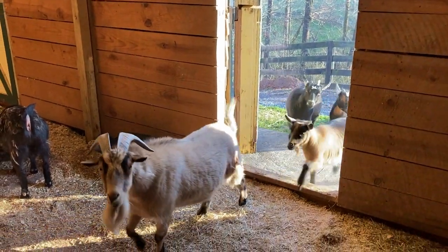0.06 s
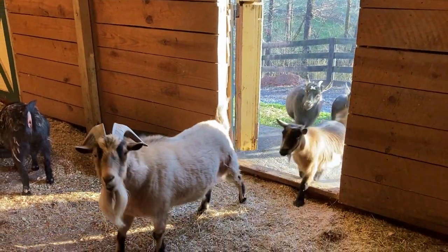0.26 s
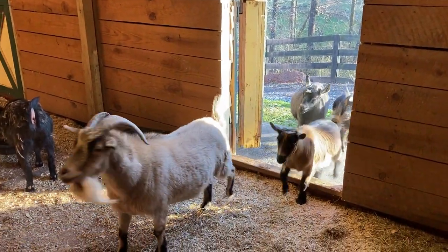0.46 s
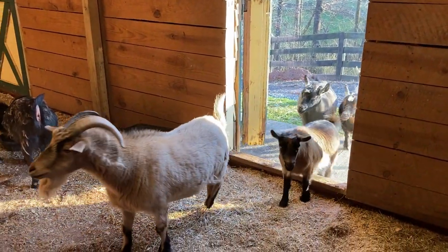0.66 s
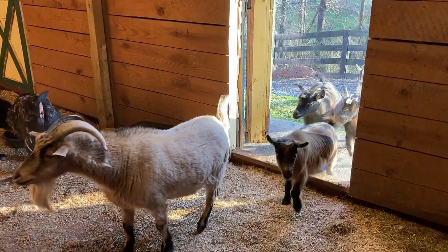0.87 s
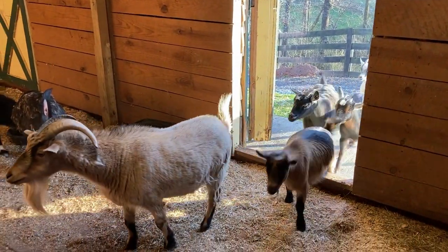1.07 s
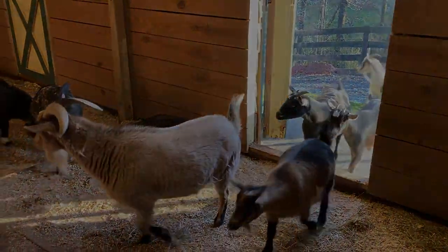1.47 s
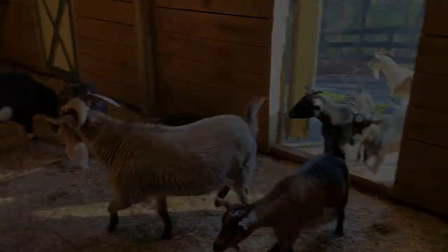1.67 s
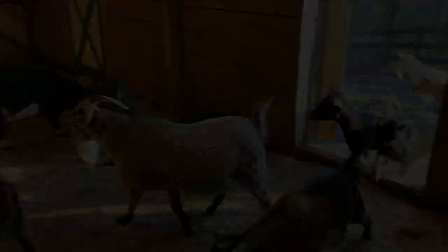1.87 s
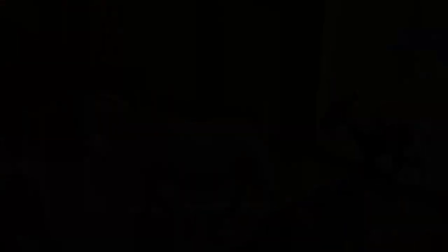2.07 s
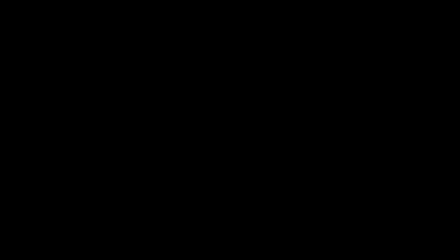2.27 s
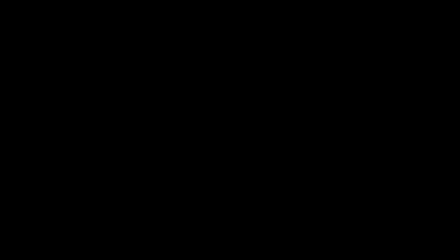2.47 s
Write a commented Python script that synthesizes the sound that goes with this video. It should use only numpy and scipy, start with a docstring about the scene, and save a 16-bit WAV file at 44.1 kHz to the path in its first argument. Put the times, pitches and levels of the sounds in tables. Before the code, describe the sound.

Goat hooves thud softly on a wooden barn floor, strongest around 0.2 and 0.3 seconds, leaving the boards booming briefly. A hoof knocks sharply at about 1.1 seconds. Bedding rustles, scuffs and ticks close by throughout, with a crisp snap at 1.5 seconds. Faint rising whistles, probably a bird outside, come near 1 and 1.3 seconds. Lighter steps follow around 1.7 and 2.1 seconds as the quiet background hiss fades.

```python
"""Inside a barn, on a wooden floor strewn with shavings, goats are walking about. Their soft thuds run
through the boards as bending waves, treble first and bass last, and leave the floor booming; a hoof
knocks sharply on wood. Bedding rustles, scuffs and snaps, and single straws tick close to the microphone.
A thin rising whistle, probably a bird outside, sounds over a quiet hiss."""
import sys
import numpy as np
from scipy import signal
from scipy.fft import rfft, irfft
from scipy.io import wavfile

SR = 44100
rng = np.random.default_rng(int(sys.argv[2]) if len(sys.argv) > 2 else 0)


def transcribe(signal):
    """Save signal, clipped to [-1, 1], as a 16-bit WAV file at the path in sys.argv[1]."""
    frames = np.atleast_2d(signal).T
    limited = np.clip(frames, -1, 1)
    pcm = np.round(limited * 32767).astype(np.int16)
    wavfile.write(sys.argv[1], SR, pcm)


N = 110250
T = np.arange(N) / SR
HZ = np.maximum(np.arange(N + 1) * SR / (2 * N), 1)  # bins of an FFT padded to 2 N


def undb(db):
    """Decibels to gain."""
    return 10 ** (np.asarray(db) / 20)


def filt(x, gain):
    """Apply a frequency response given on HZ."""
    return irfft(rfft(x, 2 * N) * gain)[..., :N]


def lowpass(hz, order=3):
    """Response of a causal low-pass."""
    return signal.freqs(*signal.butter(order, 1, analog=True), HZ / hz)[1]


def highpass(hz):
    """Gain of a gentle high-pass, one half at hz."""
    return HZ ** 2 / (HZ ** 2 + hz ** 2)


def delay(s):
    """Response of a delay."""
    return np.exp(-2j * np.pi * HZ * s)


def colour(x, spectrum):
    """Give white noise a spectrum and keep its power."""
    hz, db = np.array(spectrum).T
    gain = undb(np.interp(np.log(HZ), np.log(hz), db))
    return filt(x, gain / np.sqrt(np.mean(gain ** 2)))


def noise(wide_hz=556):
    """Diffuse stereo noise, alike on both sides in the bass."""
    mid, side = rng.standard_normal((2, N))
    apart = highpass(wide_hz) / 2
    return filt(mid, np.sqrt(1 - apart)) + np.array([[1], [-1]]) * filt(side, np.sqrt(apart))


def fade(t60, start=0):
    """Exponential decay that falls 60 dB in t60 seconds from its start."""
    return np.exp(-np.log(1000) * np.maximum(T - start, 0) / t60) * (T >= start)


def bursts(events, t60):
    """Noise that jumps up at each event and dies away."""
    return noise() * sum(undb(db) * fade(t60, s) for s, db in events)


def ring(modes):
    """Impulse response of a table of modes."""
    return sum(undb(db) * fade(t60) * np.sin(2 * np.pi * hz * T) for hz, db, t60 in modes)


def tail(bands):
    """Frequency response of dense ringing: noise that dies away band by band."""
    wash, centres = noise(), np.log([row[0] for row in bands])
    shares = [np.interp(np.log(HZ), centres, row) for row in np.eye(len(bands))]
    ringing = sum(undb(db) * filt(wash, share) * fade(t60) for share, (_, db, t60) in zip(shares, bands))
    return rfft(ringing, 2 * N)


def barn(x, wet_db):
    """The direct sound reaches the microphone, then the barn's short reverberation."""
    # reverberation bands (frequency [Hz], relative level [dB], t60 [s])
    bands = [(297, 7, 0.24), (960, 7, 0.21), (3240, 0.5, 0.17), (8000, 2, 0.1), (16700, -4, .12)]
    return filt(x, 1 + undb(wet_db) * tail(bands) * delay(.004))


def air():
    """Low, dull room tone of the open barn."""
    # room tone spectrum (frequency [Hz], relative level [dB])
    spectrum = [(20, -32), (40, -3), (65, 5), (100, 2), (200, -12.5), (420, -7.5), (600, -13.5),
                (1000, -18.5), (1600, -25), (4000, -25.5), (16000, -83)]
    # drift of the room tone (time [s], level [dB])
    levels = [(0, -53.5), (.7, -51.5), (1.35, -53.5), (1.68, -59.5), (2.05, -64.5), (2.33, -60), (2.5, -72)]
    return colour(noise(), spectrum) * undb(np.interp(T, *np.array(levels).T))


def whistles():
    """Probably a bird outside: near-pure notes that swell as they rise and level off."""
    # notes (start [s], length [s], start pitch [Hz], end pitch [Hz], level [dB])
    notes = [(.76, .12, 2500, 2580, -67), (.98, .165, 2300, 2720, -55), (1.285, .19, 2150, 2770, -56)]
    out = 0
    for s, length, from_hz, to_hz, db in notes:
        progress = np.clip((T - s) / length, 0, 1)
        hz = to_hz + (from_hz - to_hz) * (1 - progress) ** 2.4
        swell = np.interp(progress, [0, .08, .38, .46, .74, .92, 1], [0, .15, .2, .85, 1, .7, 0])
        out += undb(db) * swell * np.sin(2 * np.pi * np.cumsum(hz) / SR)
    return out


def rustle(grains_per_s=400, grain_db=-5.5):
    """Hiss with the fine grain of trodden shavings."""
    # spectrum of the shavings (frequency [Hz], relative level [dB])
    spectrum = [(800, -16), (2000, 0), (3500, -7), (5300, -5), (7000, -4.5), (9300, -0.5), (12000, -4),
                (15500, -8.5)]
    # rise and fall of the rustle (time [s], relative level [dB])
    levels = [(0, -65.5), (.17, -70), (.22, -61.5), (.29, -67.5), (.34, -64), (.42, -72), (.46, -65.5),
              (.57, -71), (.61, -65.5), (.9, -67.5), (1.0, -68), (1.15, -64.5), (1.4, -69), (1.6, -67.5),
              (1.71, -75.5), (1.82, -73), (1.88, -70), (1.97, -69), (2.13, -76.5), (2.28, -72.5),
              (2.5, -85.5)]
    grains = (rng.random(N) < grains_per_s / SR) * rng.standard_normal((2, N))
    grains *= undb(np.minimum(rng.exponential(size=N), 4))
    texture = noise() + undb(grain_db) * grains / grains.std()
    return colour(texture, spectrum) * undb(4.5 + np.interp(T, *np.array(levels).T))


def ticks():
    """Dry straws close to the microphone give very short, high ticks."""
    # single straws (time [s], relative level [dB])
    straws = [(.848, -31.5), (1.026, -38), (1.893, -40.5), (2.098, -43)]
    return filt(bursts(straws, t60=.0035), highpass(6000))


def scuffs():
    """Dragged hooves make swells of friction noise, dull on bare wood and bright in the shavings."""
    # drags (start [s], length [s], level [dB], centre [Hz], width [Hz])
    drags = [(0.404, 0.11, -60, 1780, 200), (0.618, 0.026, -58, 3400, 2500),
             (0.894, 0.067, -54.5, 880, 900), (.925, 0.031, -56, 2960, 1800),
             (1.594, 0.081, -59, 1430, 1400), (1.644, 0.084, -56, 440, 150),
             (1.849, 0.04, -61.5, 2900, 5000), (1.947, 0.081, -61, 390, 293), (2.29, 0.16, -84, 490, 490)]
    out, friction = 0, noise()
    for s, length, db, hz, width_hz in drags:
        band = 1 / (1 + ((HZ ** 2 - hz ** 2) / (HZ * width_hz)) ** 2)
        swell = np.interp((T - s) / length, [0, .28, 1], [0, 1, 0])
        out += undb(db) * swell * filt(friction, band / np.sqrt(np.mean(band ** 2)))
    return out


def snaps():
    """Single stalks and shavings break under a hoof in short bright bursts."""
    # breaking stalks (time [s], relative level [dB])
    breaks = [(0.239, -29), (0.591, -19), (.623, -26), (0.932, -16.5), (1.057, -5.5), (1.133, -13),
              (1.441, -14.5), (1.4843, -1), (1.486, -10), (1.494, -36), (1.5, -15), (1.565, -37),
              (2.095, -15), (2.188, -22.5), (2.28, -19.5)]
    # spectrum of a snap (frequency [Hz], relative level [dB])
    spectrum = [(500, -10), (1500, -7), (3000, 2), (5000, -1.5), (8000, -3.5), (12000, -2.5), (16000, -3.5)]
    return undb(-34.5) * colour(bursts(breaks, t60=.013), spectrum)


def knocks(plank_db=-45, crack_db=-31, detune=.025):
    """Hoof blows crack and ring a plank, each a little differently; a harder contact is brighter."""
    # hoof on wood (time [s], relative level [dB], contact cut-off [Hz])
    blows = [(1.056, 3.5, 3750), (1.062, 0, 1470), (1.069, 2, 1340), (1.114, -19, 3000),
             (1.615, -22.5, 2640), (1.624, -19.5, 1210)]
    # plank modes (frequency [Hz], relative level [dB], t60 [s])
    plank = [(644, -16, 0.29), (779, -7, 0.29), (775, -34, .14), (840, -7.5, .13), (850, -2.5, 0.079),
             (1031, 4, 0.12), (1582, -12, 0.24), (1815, 1.5, 0.07), (2490, -6, 0.04), (2683, -8, 0.36),
             (3410, -2.5, .05)]
    # bands of the splintery crack (frequency [Hz], relative level [dB], t60 [s])
    crack_bands = [(300, -32, .12), (577, -2, 0.066), (850, 7, 0.11), (1240, -12, 0.36), (1870, -5.5, 0.27),
                   (3280, -5, 0.098), (5800, -31, 0.033), (12000, -8, .02)]
    out = 0
    for s, db, contact_hz in blows:
        modes = [(hz * (1 + detune * rng.uniform(-.83, 1)), level, t60) for hz, level, t60 in plank]
        crack = irfft(tail(crack_bands))[:, :N]
        wood = undb(plank_db) * ring(modes) + undb(crack_db) * crack
        out += filt(wood, undb(db) * delay(s) * lowpass(contact_hz, order=2))
    return out


def thuds(wave_db=15, timber_db=-2, front_hz=450, pan_db=-3.5):
    """Soft steps spread as bending waves, return from the floor's edges and ring its modes and timber."""
    # hoof falls (time [s], relative level [dB], contact cut-off [Hz], floor boom [dB])
    steps = [(.216, 0, 346, -4), (.336, 7.5, 353, 2.5), (0.499, -25.5, 152.5, 24), (.66, -12.5, 129, 4.5),
             (.735, -19, 143, -3), (1.06, -7, 333, 0.5), (1.49, -19, 73, 14), (1.727, -12, 298, -3),
             (2.141, -9.5, 398, 0)]
    # returns from the floor's edges (delay [s], gain [dB], cut-off [Hz])
    returns = [(.033, -6, 220)]
    # floor modes (frequency [Hz], relative level [dB], t60 [s])
    floor_modes = [(77.86, -45.5, 0.9), (135, -35, 0.47), (174, -71, 0.18), (193, -46.5, 0.39),
                   (213.7, -46, 0.21), (254.6, -39, 0.27)]
    # dense ringing of the barn's timber (frequency [Hz], relative level [dB], t60 [s])
    timber_bands = [(40.5, -15, 1), (63.5, -15, 1), (122, -6.5, 0.52), (181, -4.5, 0.41), (324, -5.5, 0.18),
                    (540, -17, 0.24), (930, -12, 0.12)]
    # bending waves travel as the root of frequency; all above front_hz arrive together
    lag_s = .026 * np.maximum(np.sqrt(100 / HZ) - np.sqrt(100 / front_hz), 0)
    bending = np.exp(-2j * np.pi * np.cumsum(lag_s) * SR / (2 * N))
    radiation = highpass(157)  # the boards radiate little bass
    paths = 1 + sum(undb(db) * delay(s) * abs(lowpass(hz)) for s, db, hz in returns)
    wave = undb(wave_db) * radiation * paths * abs(lowpass(front_hz))
    boom = rfft(ring(floor_modes), 2 * N)
    spectrum = 0
    for s, db, contact_hz, boom_db in steps:
        body = wave + undb(boom_db) * boom + undb(timber_db) * tail(timber_bands)
        spectrum += undb(db) * delay(s) * lowpass(contact_hz, order=4) * bending * body
    bedding = abs(lowpass(700, order=6))  # muffles every step
    balance = undb([[pan_db / 2], [-pan_db / 2]])  # a little to the right
    return irfft(spectrum * bedding)[:, :N] * balance


def scene():
    """The barn from the microphone's position: background, bedding and hooves."""
    background = air() + barn(whistles(), wet_db=-34)
    bedding = rustle() + ticks() + scuffs() + barn(snaps(), wet_db=-26)
    hooves = barn(knocks(), wet_db=-37) + thuds()
    return background + bedding + hooves


def record(dry, low_cut_hz=45, crossover_hz=7000, lag_s=.000221, top_hz=15800):
    """Stereo pickup, cut at both ends; the left's high treble is mostly the right's, late and inverted."""
    left, right = signal.sosfilt(signal.butter(3, low_cut_hz, "high", fs=SR, output="sos"), dry)
    bleed = .99 * np.sqrt(np.clip(1 - abs(lowpass(crossover_hz, order=8)) ** 2, 0, 1))
    left = filt(left, np.sqrt(1 - bleed ** 2)) - filt(right, bleed * delay(lag_s))
    top_cut = signal.ellip(10, .2, 70, top_hz, fs=SR, output="sos")
    return signal.sosfilt(top_cut, np.array([left, right]))


dry = scene()
out = record(dry)
transcribe(out)
```